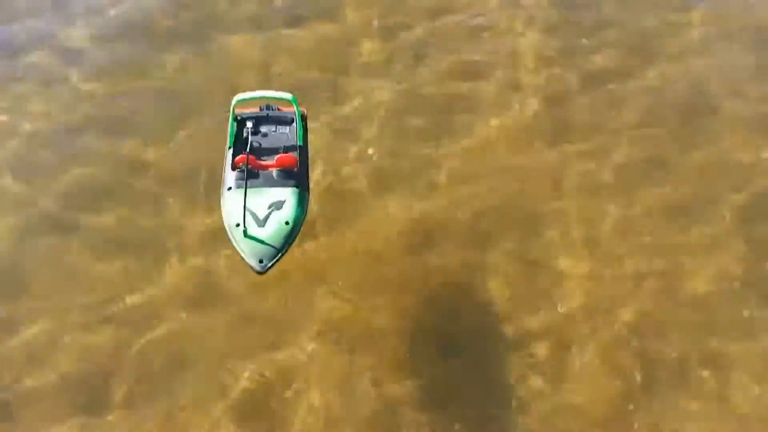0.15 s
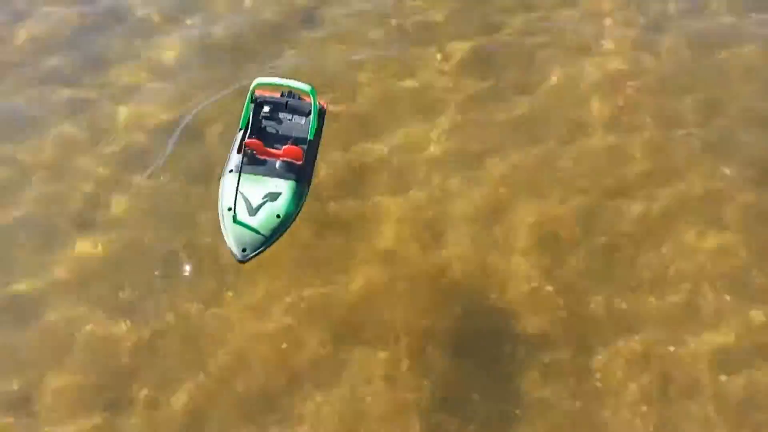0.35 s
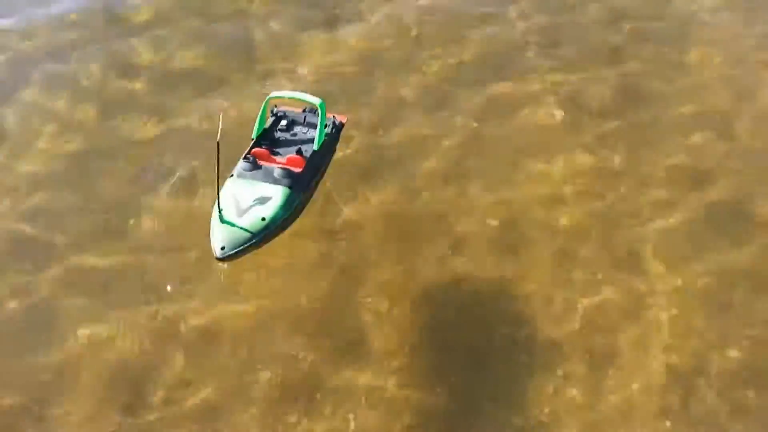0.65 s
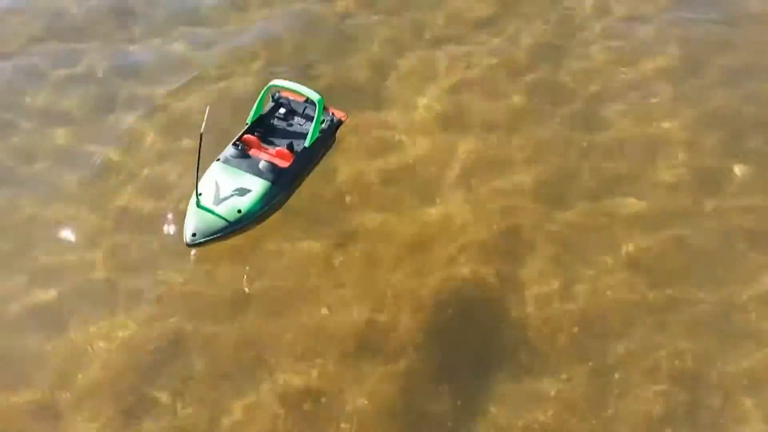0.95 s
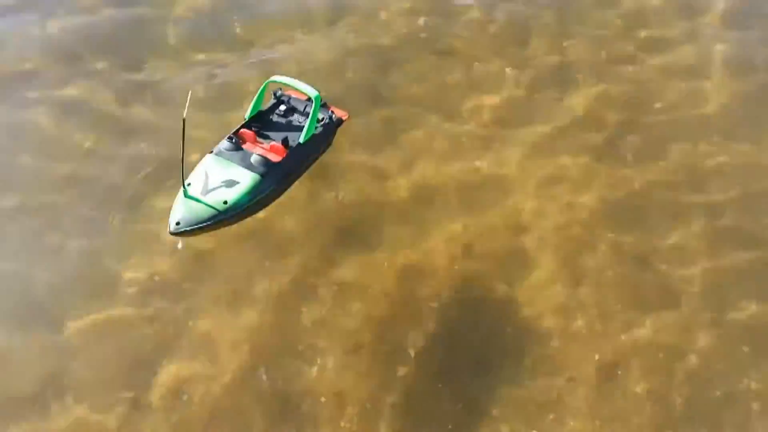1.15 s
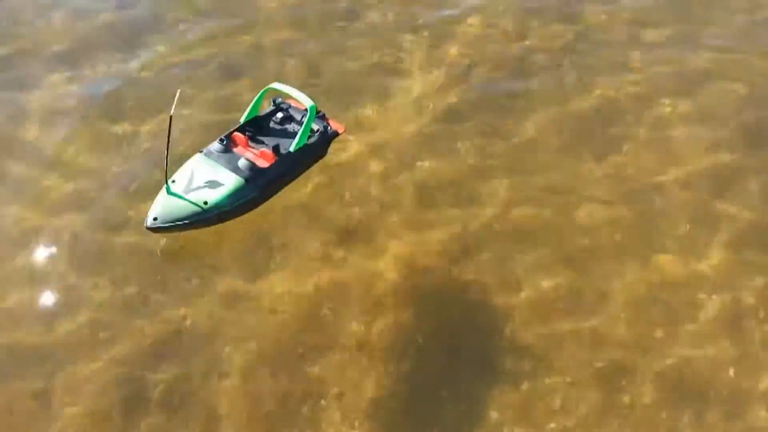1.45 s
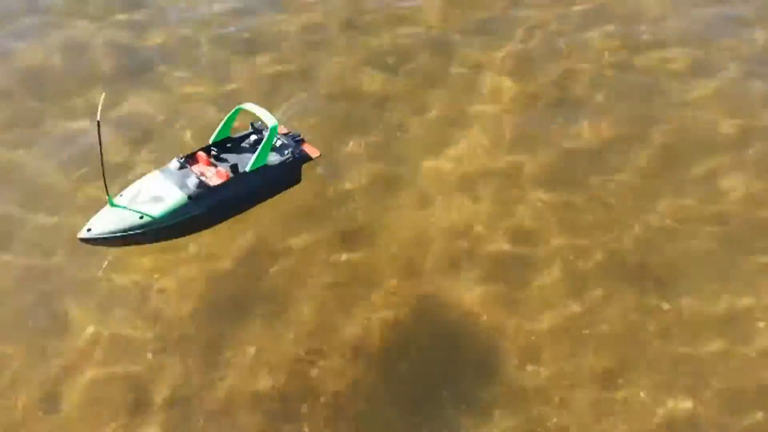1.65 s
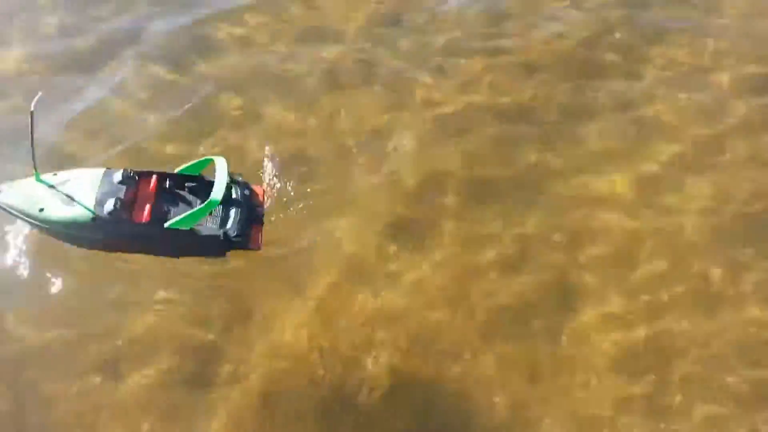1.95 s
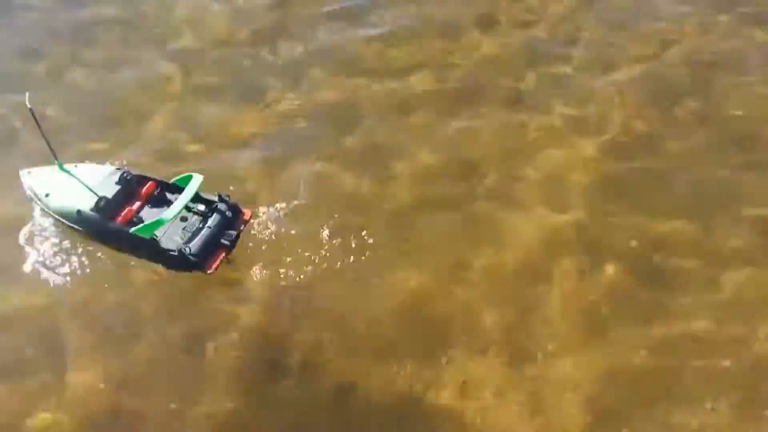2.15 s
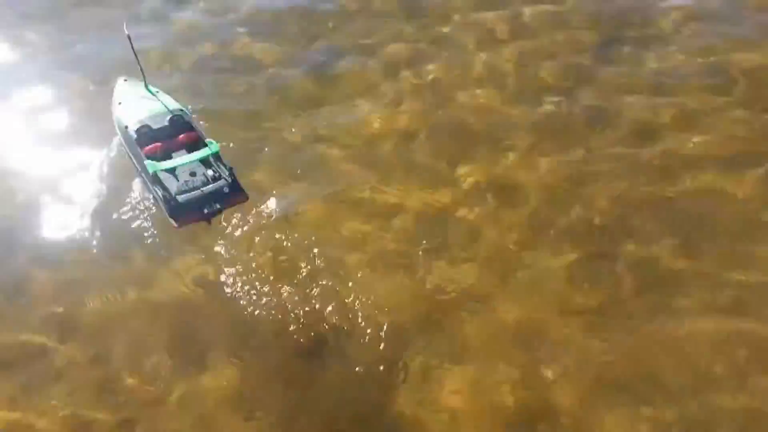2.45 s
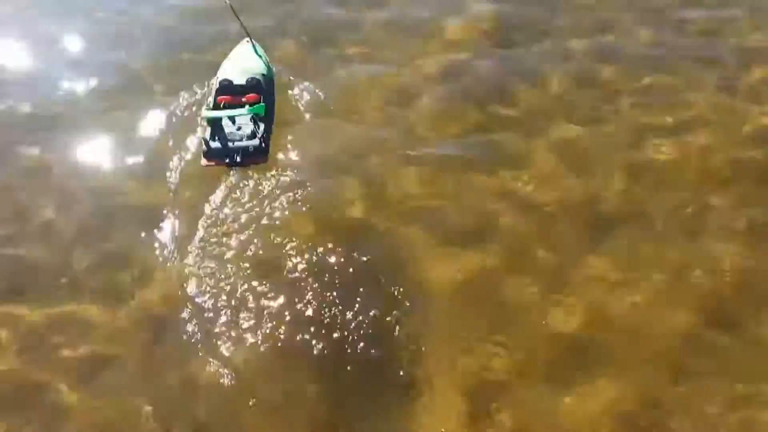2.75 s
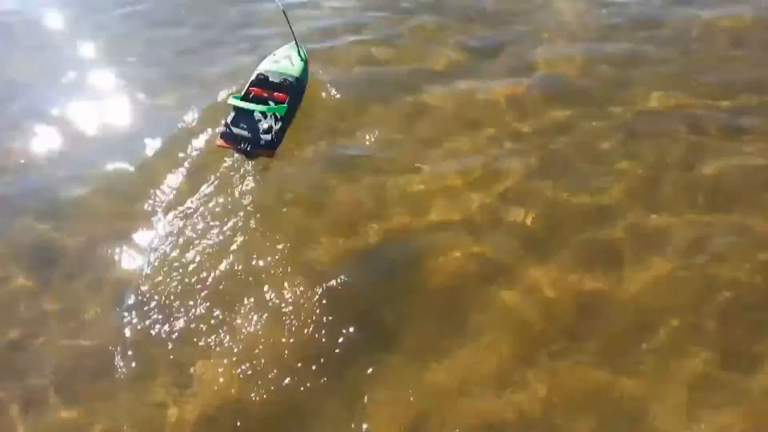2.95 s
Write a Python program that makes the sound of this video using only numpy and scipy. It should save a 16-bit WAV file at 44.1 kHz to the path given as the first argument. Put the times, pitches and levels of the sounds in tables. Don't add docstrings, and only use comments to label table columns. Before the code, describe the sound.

A model boat's small electric motor is almost silent over faint hiss, makes weak stuttering buzzes and gear clicks, then quickly revs up into a steady rattling whine, outdoors on shallow water, close stereo microphone, leaning left.

```python
import sys
import numpy as np
from scipy import signal
from scipy.io import wavfile
from scipy.ndimage import uniform_filter1d

SR = 44100
rng = np.random.default_rng(int(sys.argv[2]) if len(sys.argv) > 2 else 0)


def to_linear_factor(level_db):
    exponent = np.asarray(level_db, float) / 20
    return 10 ** exponent


def dump_mix(stems):
    frames = np.atleast_2d(stems).T
    limited = np.clip(frames, -1, 1)
    pcm = np.round(limited * 32767).astype(np.int16)
    wavfile.write(sys.argv[1], SR, pcm)


N = 136710

# time in seconds, level in dB.
EFFORT = [(.765, -80), (.78, -58), (.8, -52), (.86, -43), (.882, -45), (.895, -55), (.948, -49),
          (.958, -39.5), (1.036, -38.5), (1.054, -55), (1.105, -55), (1.125, -47), (1.28, -47),
          (1.289, -37.5), (1.33, -36), (1.405, -25), (1.5, -24), (3.1, -24)]
# time in seconds, speed in turns per second.
SHAFT_SPEED = [(1.3, 30), (1.335, 37), (1.375, 47), (1.41, 63), (1.435, 78), (1.465, 92), (1.494, 96.9),
               (1.61, 100.6), (1.72, 101.9), (1.936, 102.7), (2.106, 104.4), (2.28, 103.7), (2.42, 103.1),
               (2.632, 104.4), (2.794, 103.5), (2.914, 103.1), (3.1, 103.1)]
# time in seconds, heading from 0 (side on) to 1 (stern on).
HEADING = [
    (1.45, 0.036),
    (1.7, 0.14),
    (1.9, 0.061),
    (2.05, 0.26),
    (2.2, 0.41),
    (2.4, 0.39),
    (2.55, 0.79),
    (2.75, .99),
    (2.9, 0.64),
    (3.1, 0.49),
]
# multiple of shaft speed, level in dB.
SIDE_ORDERS = [(1, -49), (2, -25.5), (3, -14.5), (4, -15), (5, -28), (6, -20), (7, -16), (8, -22),
               (9, -20.5), (10, -7.5), (11, -10.5), (12, -13), (13, -12), (14, -6.5), (15, -15), (16, -15),
               (17, 0), (18, -6), (19, -17), (20, -7)]
# multiple of shaft speed, level in dB.
STERN_ORDERS = [(1, -49), (2, -21.5), (3, -22), (4, -24.5), (5, -21.5), (6, -23.5), (7, -23.5), (8, -28),
                (9, -9.5), (10, 3.5), (11, -8.5), (12, -11.5), (13, -11), (14, 4.5), (15, -8), (16, -5),
                (17, -16.5), (18, -3), (19, -32), (20, -65)]
# multiple, centre in seconds, half width in seconds, change in dB.
ORDER_SWELLS = [(14, 1.385, 0.048, 5), (14, 1.6, 0.027, 15), (14, 1.6, 0.059, -17), (14, 2.18, 0.038, 6),
                (7, 1.49, 0.063, 10.5), (3, 1.53, .08, 3.5), (11, 1.64, 0.1, -3), (10, 1.64, 0.055, -9),
                (10, 1.97, 0.044, -38), (17, 1.7, 0.12, 8.5), (4, 2.0, 0.029, 8.5), (4, 2.174, 0.073, -11),
                (18, 2.88, 0.062, 6.5), (31, 2.8, 0.097, 9.5), (13, 1.94, 0.17, 4), (14, 1.83, 0.084, 5),
                (12, 2.28, 0.21, 4), (9, 3.08, 0.13, 8)]
# centre in Hz, width in Hz, level stalled, side on and stern on in dB.
HULL_MODES = [(261.4, 27, 6, -8.5, -25), (629, 133, 7.5, -10, -12), (876, 78, 9.5, -17, -7),
              (1108, 154, 3.5, -5.5, -1), (1372, 185, 9, -4.5, -3.5), (1788, 285, 5, 2, -0.5),
              (2830, 120, 1, -8, -4.5), (3245, 110, 6, -17, -0.5), (3610, 1410, 2.5, -3, -4.5),
              (4650, 2150, -0.5, 0, -4), (6600, 2070, -2.5, -1.5, -0.7), (9720, 4300, -20.5, -9.5, -9),
              (12430, 5000, -29, -14, -15.5), (15040, 700, -22, -10.5, -14.5)]
# centre in Hz, width in Hz, change in dB.
STEADY_BANDS = [(2250, 370, 6.5), (5660, 950, -3), (9070, 700, -4.5), (11460, 590, -5.5), (13000, 700, -2)]
# time in seconds, centre in Hz, half length in seconds, change in dB.
WAKE_NULLS = [(1.51, 6800, 0.025, 2.5), (1.54, 3200, 0.057, -17), (1.623, 4100, .03, 4),
              (1.658, 2520, .05, -10), (1.737, 3360, 0.023, 11), (1.742, 7300, .05, 8),
              (1.733, 6500, 0.029, 9.5), (1.773, 2700, .07, -12), (1.86, 1650, 0.024, 2),
              (1.904, 6300, 0.073, 10.5), (1.905, 2900, 0.052, 7), (1.95, 1070, 0.036, -17),
              (1.987, 4800, 0.029, 8), (2.0, 2650, 0.027, -7), (2.047, 3700, 0.054, 8.5),
              (2.068, 4270, 0.063, 6), (2.09, 5510, 0.061, 10), (2.136, 2800, 0.064, 9),
              (2.153, 4530, 0.053, 10), (2.276, 3150, .03, 1), (2.06, 1700, 0.064, -19),
              (2.363, 1670, 0.083, -18), (2.36, 2500, 0.11, 8), (2.433, 2120, 0.028, -28),
              (2.483, 1980, 0.041, -26), (2.547, 5200, 0.055, 11), (2.634, 3250, .09, 5),
              (2.64, 4680, 0.021, 9), (2.7, 2170, 0.02, -26), (2.766, 2250, .045, -30),
              (2.762, 6600, 0.1, 4.5), (2.77, 7700, 0.055, 3), (2.883, 2400, 0.044, -12),
              (2.91, 3320, 0.035, 10.5), (2.902, 5200, 0.018, 7), (2.98, 5260, .03, -1),
              (3.08, 5530, 0.033, -8)]
# frequency in Hz, loss at the right port in dB.
LEFT_LEAN = [(500, -.6), (1100, 3), (1400, 7), (1750, 3.5), (2750, -2.5), (3800, 5.5), (6300, 7),
             (8200, 22)]
# frequency in Hz, likeness from 0 to 1.
BOAT_LIKENESS = [(130, .99), (600, .975), (1000, .93), (1800, .75), (2400, .3), (3400, .6), (5200, .45),
                 (7000, .2)]
# frequency in Hz, lead in radians.
RIGHT_LEAD = [(300, .1), (1100, .3), (1400, 1.0), (1750, 1.2), (2100, 2.6), (2450, 6.3), (3000, 6.8),
              (3800, 9.2), (4700, 10.3)]
# time in seconds, peak in dB, ring in Hz.
TOOTH_SLIPS = [(.8063, -34, 3600), (0.8382, -43, 3450), (.8482, -36, 3380), (.8731, -39, 3490),
               (0.925, -45, 3460), (0.9534, -41, 3150), (1.029, -26, 1380), (0.972, -37, 3340),
               (.992, -41, 4800), (1.016, -33, 3530), (1.1221, -52, 2850), (1.1515, -52, 3440),
               (1.2388, -58, 3530), (1.2637, -60, 3000), (1.286, -34, 5000), (1.2997, -41, 3530),
               (1.3278, -22, 3410), (1.361, -27, 3400)]
# time in seconds, half length in seconds, change in dB.
GEAR_CATCHES = [
    (1.25, 0.004, 3),
    (1.278, 0.0035, -11),
    (1.318, 0.0026, 6),
]
# start in seconds, length in seconds, first and second tone in dB.
CHOP_BURSTS = [
    (0.77, 0.031, -53, -65),
    (0.794, 0.21, -55, -73),
    (1.081, 0.022, -55, -42.5),
    (1.113, 0.16, -52.5, -62),
]
# frequency in Hz, level in dB.
FLOOR_SPECTRUM = [(30, -38), (110, 0.5), (200, -18.5), (550, -22), (1900, -30), (6500, -31), (8000, -41),
                  (13500, -41)]
# frequency in Hz, likeness from 0 to 1.
FLOOR_LIKENESS = [(60, 0.29), (130, 0.89), (290, 0.26), (640, 0.21), (1400, .02)]
# centre in Hz, width in Hz, level in dB.
FAR_ENGINES = [(52.5, 6.7, -69), (78.6, 15, -67.5), (124.7, 3.2, -58), (460, 8.1, -75.5)]

STEP = 64
FREE_S, FREE_RISE_S = 1.3, 0.09
MESH_S, MESH_RISE_S = 1.43, 0.04
RIGHT_ONLY = np.array([[0], [1]])


def evened(x):
    return x / np.sqrt(np.mean(abs(x) ** 2) + 1e-20)


def read(points, hz):
    f, value = np.transpose(points)
    return np.interp(np.log(hz + 1), np.log(f + 1), value)


def curve(points):
    return np.interp(np.arange(N) / SR, *np.transpose(points))


def ramp(s, start_s, rise_s, low=0):
    return np.clip((s - start_s) / rise_s, low, 1)


def drift(width_hz, count):
    steps = N // STEP + 2
    z = rng.standard_normal((count, steps)) + 1j * rng.standard_normal((count, steps))
    f = np.fft.fftfreq(steps, STEP / SR)
    return evened(np.fft.ifft(np.fft.fft(z) * np.exp(-(f / width_hz) ** 2)))


def full(slow):
    return np.interp(np.arange(N) / STEP, np.arange(len(slow)), slow)


def ears(shared, unshared, likeness, lead, colour):
    hz, s, z = signal.stft(np.array([shared, unshared]), SR, nperseg=512, noverlap=384)
    same = np.clip(read(likeness, hz), 0, 1)[:, None]
    right = same * z[0] + np.sqrt(1 - same ** 2) * z[1]
    right = right * np.exp(1j * lead(hz))[:, None]
    ports = np.array([z[0], right]) * colour(hz, s)
    return signal.istft(ports, SR, nperseg=512, noverlap=384)[1][:, :N]


def boat_lead(hz):
    return read(RIGHT_LEAD, hz)


def floor():
    def colour(hz, s):
        top_lift_db = 9 / (1 + ((hz - 15200) / 800) ** 4)
        return (to_linear_factor(read(FLOOR_SPECTRUM, hz)) * to_linear_factor(top_lift_db))[:, None]

    hiss = ears(*rng.standard_normal((2, N)), FLOOR_LIKENESS, np.zeros_like, colour)
    out = to_linear_factor(-59) * evened(hiss)
    t = np.arange(N) / SR
    for hz, width_hz, db in FAR_ENGINES:
        z = drift(width_hz, count=1)[0] * 0.5 + 1
        waver = full(z.real) + 1j * full(z.imag)
        out += to_linear_factor(db) * (waver * np.exp(2j * np.pi * hz * t)).real
    return out


def controller(chop_hz=1447, lag_s=0.00011):
    t = np.arange(N) / SR
    out = np.zeros((2, N))
    broken = to_linear_factor(3.5 * full(drift(40, count=1)[0].real))
    for start_s, length_s, first_db, second_db in CHOP_BURSTS:
        gate = np.clip(np.minimum((t - start_s) / 0.004, (start_s + length_s - t) / 0.0086), 0, 1)
        if length_s > 0.1:
            gate = gate * broken
        for k, db in ((1, first_db), (2, second_db)):
            tone = np.sin(2 * np.pi * k * chop_hz * (t + lag_s * RIGHT_ONLY))
            out += gate * to_linear_factor(db) * tone * to_linear_factor([[1.5], [-1.5]])
    return out


def slips(t60_s=0.046, rise_s=0.00088):
    t = np.arange(2000) / SR
    out = np.zeros((2, N))
    for s, db, hz in TOOTH_SLIPS:
        envelope = to_linear_factor(db - 60 * t / t60_s) * (1 - np.exp(-t / rise_s))
        ring = envelope * np.sin(2 * np.pi * hz * t + boat_lead(hz) * RIGHT_ONLY)
        at = round(s * SR)
        out[:, at:at + len(t)] += ring * to_linear_factor([[-2.5], [-6]])
    return out


def hull(hz, s):
    free = ramp(s, FREE_S, FREE_RISE_S)
    meshed = ramp(s, MESH_S, MESH_RISE_S)
    heading = np.clip(np.interp(s, *np.transpose(HEADING)), 0, 1)
    narrow = 0.4 + 0.6 * free
    power = 0
    for f, width_hz, stall_db, side_db, stern_db in HULL_MODES:
        running = 0.36 * free + 0.55 * meshed if f < 2200 else free
        running_db = side_db + heading * (stern_db - side_db)
        db = stall_db + running * (running_db - stall_db)
        width = width_hz * narrow if f > 3300 else width_hz
        power = power + to_linear_factor(db) ** 2 / (1 + (2 * (hz - f) / width) ** 2) ** 2
    valley = to_linear_factor(-16 - 6.2 * (1.5 - free)) ** 2 / (1 + (hz / (5000 + 2500 * free)) ** 6)
    bass_cut = 1 + ((190 + 110 * meshed) / (hz + 1)) ** 6
    dips_db = sum(db * np.exp(-(2 * (hz - f) / width_hz) ** 2) for f, width_hz, db in STEADY_BANDS)
    return np.sqrt((power + valley) / bass_cut) * to_linear_factor(dips_db)


def turning(hz, s, patchy_db):
    patch = rng.standard_normal((2, len(hz), len(s)))
    patch = uniform_filter1d(patch, size=4, axis=1)
    patch = evened(uniform_filter1d(patch, size=40, axis=2))
    same = np.clip(read(BOAT_LIKENESS, hz), 0, 1)[:, None]
    patch = np.array([patch[0], same * patch[0] + np.sqrt(1 - same ** 2) * patch[1]])
    nulls_db = 0
    for at_s, f, half_s, db in WAKE_NULLS:
        band = ((hz[:, None] - f) / (40 + 0.037 * f)) ** 2
        nulls_db = nulls_db + db * np.exp(-band - ((s - at_s) / half_s) ** 2)
    lean_db = read(LEFT_LEAN, hz)[:, None] * RIGHT_ONLY[:, :, None]
    return to_linear_factor(nulls_db + patchy_db * ramp(s, FREE_S, FREE_RISE_S, low=0.3) * patch - lean_db)


def jerks(kick=0.53, kick_s=0.0086):
    t = np.arange(N) / SR
    kicks = sum((t > s) * np.exp(-abs(t - s) / kick_s) for s, _, _ in TOOTH_SLIPS)
    catches_db = sum(db * np.exp(-((t - s) / half_s) ** 2) for s, half_s, db in GEAR_CATCHES)
    return (1 + kick * kicks) * to_linear_factor(catches_db)


def rattle(turns, speed, knocks_per_turn=110, spread_db=1.5, beat=0.17, flutter_db=0.9):
    struck = rng.random((2, N)) < knocks_per_turn * speed / SR
    knocks = struck * rng.choice([-1., 1.], (2, N)) / np.sqrt(speed)
    knocks = evened(knocks * to_linear_factor(spread_db * np.minimum(rng.exponential(1, (2, N)), 3)))
    lumps = 1 + beat * np.cos(2 * np.pi * turns) + 0.4 * beat * np.cos(4 * np.pi * turns)
    flutter = to_linear_factor(flutter_db * full(drift(140, count=1)[0].real))
    drive = knocks * lumps * jerks() * flutter

    def colour(hz, s):
        return hull(hz[:, None], s) * turning(hz, s, patchy_db=2.77)

    out = ears(*drive, BOAT_LIKENESS, boat_lead, colour)
    return to_linear_factor(1.5) * out / np.sqrt(np.mean(out[0] ** 2))


def swell_db(k):
    s = np.arange(0, N, STEP) / SR
    return sum((db * np.exp(-((s - at_s) / half_s) ** 2)
                for multiple, at_s, half_s, db in ORDER_SWELLS if multiple == k), 0 * s)


def whine(turns, speed, wander_db=1.5, wobble_rad=0.27, fixed_share=0.45, gear_ratio=1.75, poles=14):
    t = np.arange(N) / SR
    slow_s = t[::STEP]
    heading = np.clip(curve(HEADING), 0, 1)
    slow, wear = drift(14.0, count=20), drift(8.1, count=150)
    start = rng.random(170) * 2 * np.pi
    quarter = np.array([[0], [np.pi / 2]])
    meshed = ramp(t, MESH_S, MESH_RISE_S, low=0.12)
    judder = meshed + (1 - meshed) * full(drift(60, count=1)[0].real) * 1.64

    out = np.zeros((2, N))
    out += meshed * to_linear_factor(-24.5) * np.cos(2 * np.pi * gear_ratio * turns + quarter)
    for i, ((k, side_db), (_, stern_db)) in enumerate(zip(SIDE_ORDERS, STERN_ORDERS)):
        db = side_db + (stern_db - side_db) * heading
        db = db + full(swell_db(k)) + wander_db * full(slow[i].real)
        phase = 2 * np.pi * k * turns + start[i] + wobble_rad * full(slow[i].imag)
        gate = judder if k == poles else meshed
        out += gate * to_linear_factor(db) * np.cos(phase + quarter)
    for i in range(100):
        k = 21 + i // 2
        z = wear[i] + fixed_share
        gain = hull(k * speed[::STEP], slow_s) * to_linear_factor(swell_db(k)) * abs(z[:len(slow_s)])
        phase = 2 * np.pi * k * turns + start[20 + i] + full(np.unwrap(np.angle(z)))
        out[i % 2] += to_linear_factor(-12) * full(gain) * np.cos(phase)

    engaged = ramp(t, 1.319, 0.039)
    heard = ears(*out, BOAT_LIKENESS, boat_lead, lambda hz, s: turning(hz, s, patchy_db=1.1))
    return to_linear_factor(-1.5) * engaged * heard


def scene():
    speed = curve([(0.0013, 21.98)] + list(SHAFT_SPEED))
    turns = np.cumsum(speed) / SR
    motor = whine(turns, speed) + rattle(turns, speed)
    return to_linear_factor(curve(EFFORT)) * motor + controller() + slips() + floor()


def top_cut(x):
    return signal.sosfilt(signal.butter(12, 16870, fs=SR, output="sos"), x)


def record(dry):
    edge = signal.firwin(511, 15620, window=("kaiser", 9), fs=SR)
    mix = signal.oaconvolve(dry, edge[None], "same")
    return top_cut(mix)


dry = scene()
out = record(dry)
dump_mix(out)
```